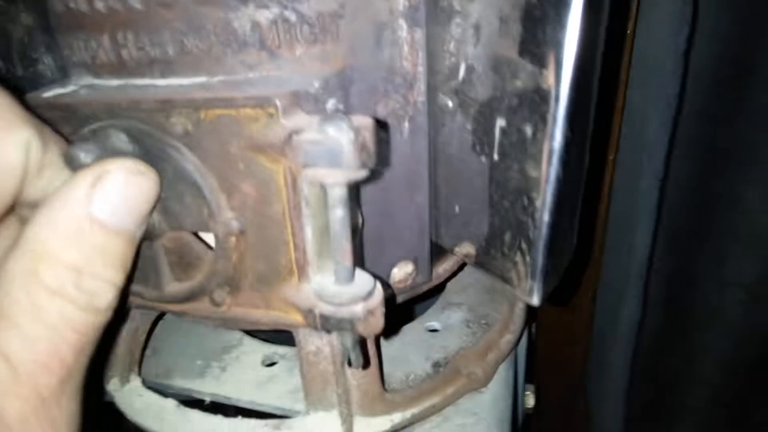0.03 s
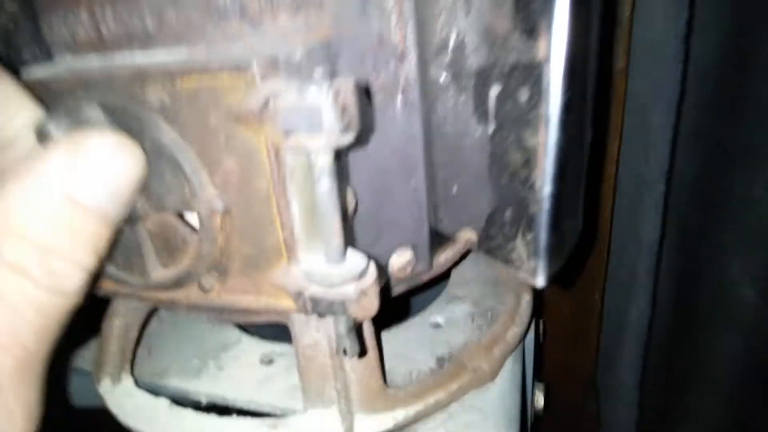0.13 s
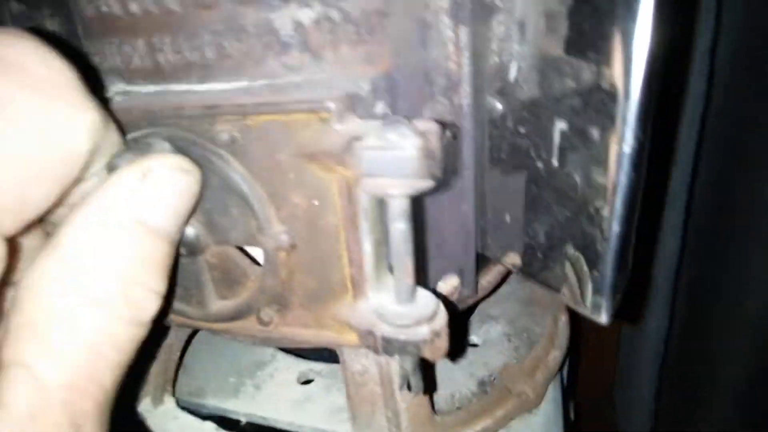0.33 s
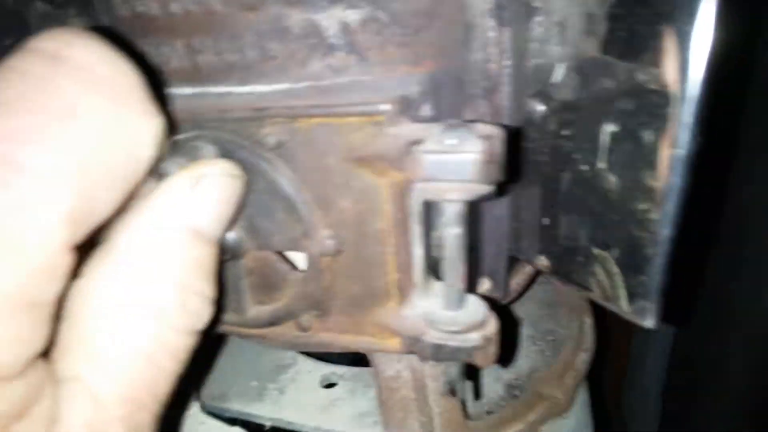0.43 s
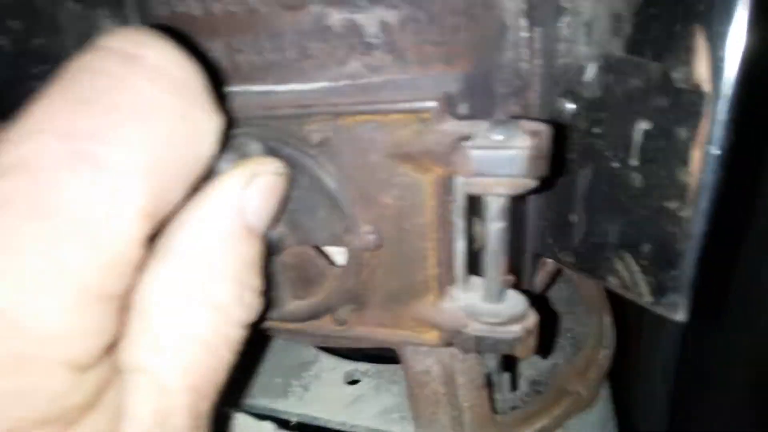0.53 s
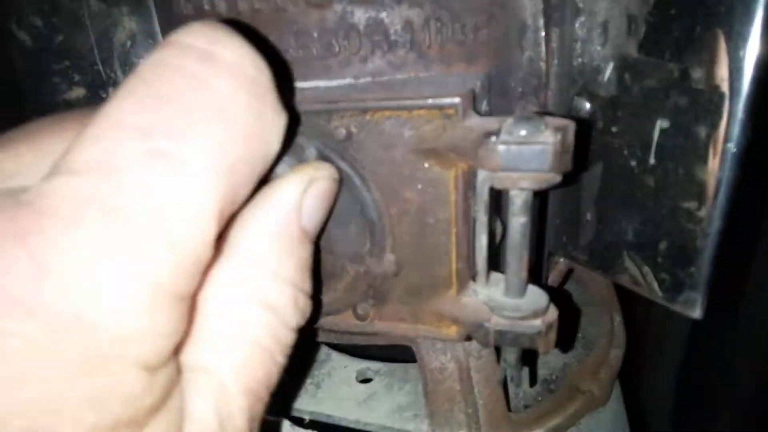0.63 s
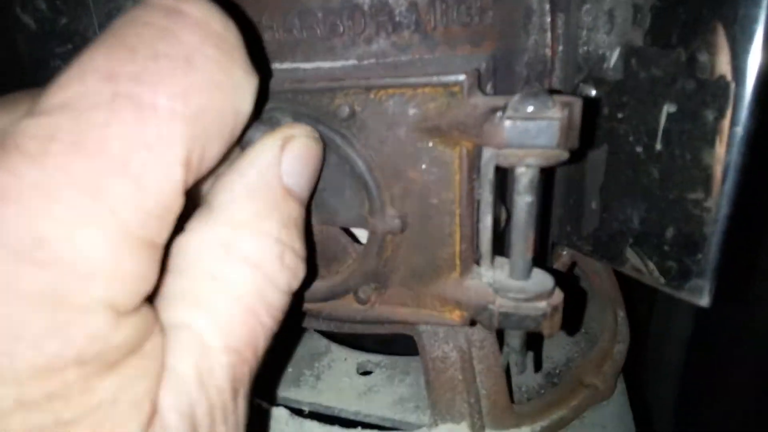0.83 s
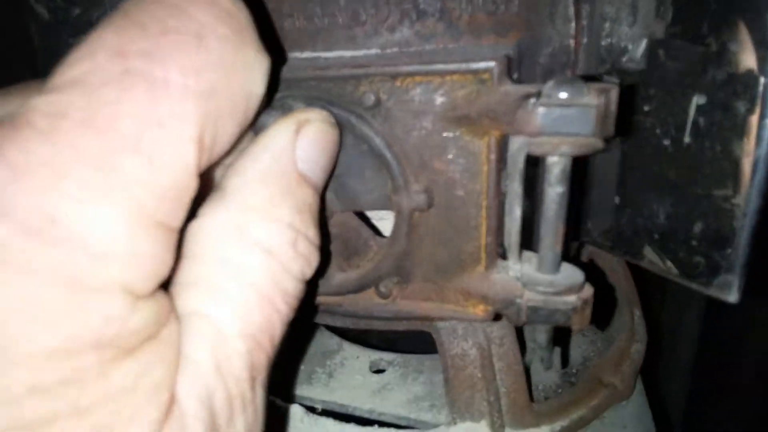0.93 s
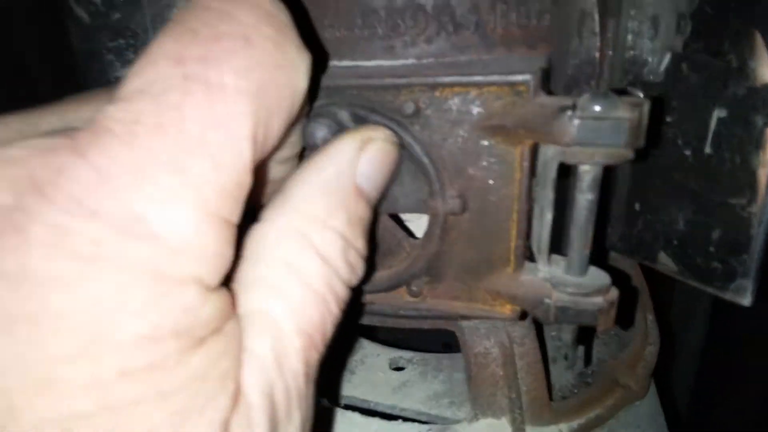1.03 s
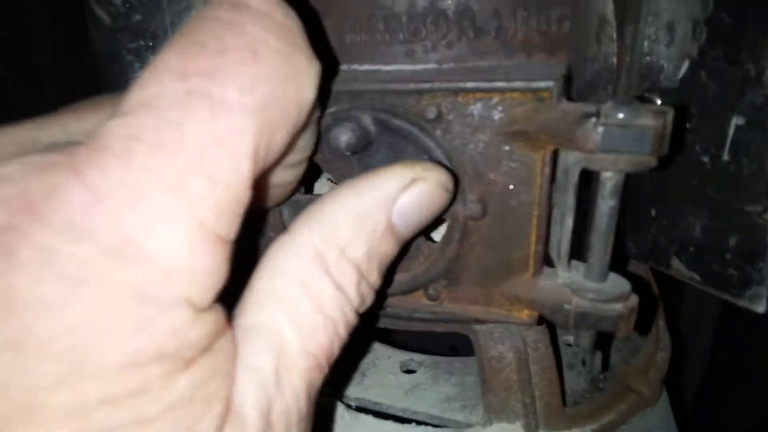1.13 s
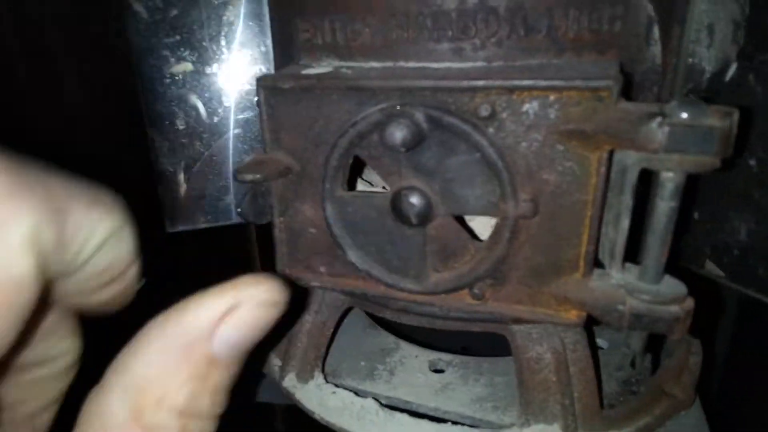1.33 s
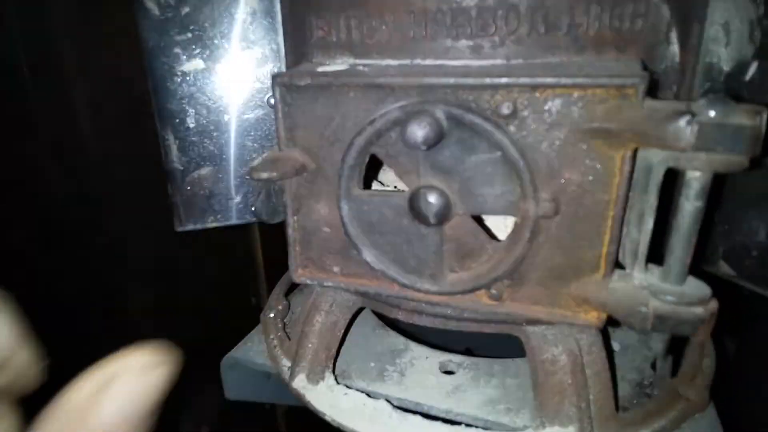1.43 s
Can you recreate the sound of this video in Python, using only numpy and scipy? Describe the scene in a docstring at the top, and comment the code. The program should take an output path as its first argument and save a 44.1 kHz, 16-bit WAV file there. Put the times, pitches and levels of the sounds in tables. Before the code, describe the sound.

A cast iron stove vent clanks and scrapes, turned by hand close by in a quiet cabin. It squeaks free from about 0.2 seconds, and the loose door clanks and rings at 0.3. From 0.7 to 1.1 seconds the rusty disc grinds round, with a sharp ringing knock near 0.8. Faint ticks of grit follow, and fingers softly bump the iron at about 1.3 seconds.

```python
"""The round air vent of a small cast iron stove, turned by hand; one microphone close by in a quiet cabin.
The disc squeaks free and the loose door clanks on its latch; then the disc grinds round on rusty
faces, knocks and settles with a few ticks of grit. The knocks ring the iron of disc, door and
stove body. Fingers bump the iron softly, once, as they let go."""
import sys
import numpy as np
from scipy import signal
from scipy.fft import rfft, irfft
from scipy.io import wavfile
from scipy.ndimage import uniform_filter1d

SR = 44100
rng = np.random.default_rng(int(sys.argv[2]) if len(sys.argv) > 2 else 0)


def generate_wav(sig):
    """Save sig (samples, or channels by samples) to the path in sys.argv[1] as 16-bit PCM at SR."""
    pcm = np.round(np.clip(np.atleast_2d(sig).T, -1, 1) * 32767).astype(np.int16)
    wavfile.write(sys.argv[1], SR, pcm)


N = 66150
T = np.arange(N) / SR
TOP_HZ = 8000


def undb(db):
    """Decibels to gain."""
    return 10 ** (np.asarray(db) / 20)

def at(hz, points):
    """Read a table on a log-frequency axis."""
    freqs, values = np.array(points).T
    return np.interp(np.log(hz + 1e-3), np.log(freqs), values)

def fade(t60):
    """Exponential decay, 60 dB down after t60 seconds."""
    return np.exp(-np.log(1000) * T / t60)

def noise(spectrum):
    """Coloured noise of rms 1."""
    hz = np.arange(N // 2 + 1) * SR / N
    x = irfft(rfft(rng.standard_normal(N)) * undb(at(hz, spectrum)), N)
    return x / x.std()

def wobble():
    """Quick random unsteadiness of spread 1."""
    x = uniform_filter1d(rng.standard_normal(N), size=200)
    return x / x.std()

def add(out, start, sound):
    """Mix a sound in at a time, which may lie before zero."""
    i = int(round(start * SR))
    part = sound[max(-i, 0):N - i]
    out[max(i, 0):max(i, 0) + len(part)] += part

def drive(force, response):
    """A force sounding through a resonant part."""
    return signal.fftconvolve(force, response)[:N]

def radiated(x, corner_hz=350):
    """Small iron plates give off little bass."""
    return signal.sosfilt(signal.butter(2, corner_hz, "high", fs=SR, output="sos"), x)

def ring(modes):
    """A struck part: decaying sines of alternating sign, their levels relative to one another."""
    power = sum(undb(db) ** 2 for _, db, _ in modes) / 2
    tones = sum((-1) ** k * undb(db) * np.sin(2 * np.pi * hz * T) * fade(t60)
                for k, (hz, db, t60) in enumerate(modes))
    return radiated(tones) / np.sqrt(power)


# spectrum of the casting's weak modes (frequency [Hz], relative density [dB])
WASH_SPECTRUM = [(100, -18), (200, -10.5), (400, -5), (800, -2.5), (1750, 5), (2300, -7.5), (3200, -14.5),
                 (4500, -29), (6200, -21.5), (8000, -38.5)]
# their decay (frequency [Hz], t60 [s])
WASH_DECAY = [(150, 0.92), (500, 0.84), (1500, 0.54), (2700, 0.63), (4000, 0.79), (8000, 0.11)]

def casting_wash(count=420):
    """Struck cast iron rings in a dense wash of weak modes."""
    jitter, side = rng.random((count, 2)).T
    root_span = np.sqrt([WASH_SPECTRUM[0][0], TOP_HZ])
    hz = np.interp(np.arange(count) + jitter, [0, count], root_span) ** 2
    gain = undb(at(hz, WASH_SPECTRUM)) * np.sign(side - .5)
    gain *= hz ** .25  # high modes lie further apart, so each carries more
    gain /= np.sqrt(np.sum(gain ** 2) / 2)
    return sum(g * np.sin(2 * np.pi * f * T) * fade(t60)
               for f, g, t60 in zip(hz, gain, at(hz, WASH_DECAY)))

# colour of the clack (frequency [Hz], relative density [dB])
CLACK_SPECTRUM = [(60, -49.5), (150, -24.5), (330, -3.5), (700, -0.5), (1700, 6), (2500, -4), (4000, -15),
                  (5000, -14.5), (6200, -34.5), (8000, -36)]

def clack(contact_s=0.0005):
    """One dry knock of iron on iron."""
    attack = 1 - np.exp(-T / contact_s)
    return radiated(noise(CLACK_SPECTRUM) * fade(t60=0.12) * attack)

# modes of the stove body (frequency [Hz], level [dB], t60 [s])
BODY_MODES = [(518, -18, 0.75), (758.7, -6, 0.79), (892, -15, 0.78), (934, -0.5, .58), (1048, -6.5, 0.27),
              (1082, -4.5, 0.79), (1169, -3, 1.11), (1236, -2.5, 0.3), (1211, 4, 0.54), (1297, -12, 0.9),
              (1438, -9, 1.31), (1488, 0, 0.48), (1797, -4, 1.1), (1910, -9, .65), (1974, 1, .5),
              (2420, -4.5, 0.47)]
# short, hand-damped modes of the vent disc (frequency [Hz], level [dB], t60 [s])
DISC_MODES = [(735, 1.5, 0.14), (1144, -9, 0.31), (1653, 3.5, 0.06), (1719, 4.5, 0.08), (2404, -13, .1)]
# blows at the vent (time [s], wash level [dB], body level [dB], disc level [dB], clack level [dB])
VENT_BLOWS = [(-0.02, -53.5, -44, -69, -83), (0.2053, -43.5, -49.5, -62.5, -47),
              (0.2134, -42.5, -45, -41, -57.5), (0.3122, -38, -56, -27.5, -27),
              (0.3256, -37.5, -47, -38.5, -30), (0.332, -51, -42, -30, -30.5), (0.7737, -54, -35, -32, -37),
              (0.7768, -35.5, -54, -20, -30.5), (0.8102, -42, -63, -44, -46),
              (0.8469, -42, -51.5, -41, -48), (0.8691, -47.5, -50.5, -51.5, -59.5),
              (0.9488, -58, -64.5, -35, -42), (1.045, -63, -59.5, -43.5, -48.5)]

def clanks(wash, body, disc):
    """Close to the microphone, each blow clacks and shares its force between stove and disc."""
    out = np.zeros(N)
    for start, wash_db, body_db, disc_db, clack_db in VENT_BLOWS:
        ringing = undb(wash_db) * wash + undb(body_db) * body + undb(disc_db) * disc
        add(out, start, ringing + undb(clack_db) * clack())
    return out

# modes of the door (frequency [Hz], level [dB], t60 [s])
DOOR_MODES = [(362, -3, 0.093), (587, -8.5, 0.6), (879, -12.5, 0.49), (981.2, 1, 0.65), (1016.4, -2, 0.75),
              (1080, -2, 0.88), (1135, 1, .36), (1360, -16.5, .4), (1416, 1, 0.4), (1666, -8, 0.44),
              (1710, 3.5, 0.12), (1757, -10, 0.83), (1853, -18, 0.93), (2096, -8, 0.62), (2356, -18, .55),
              (2845, -10.5, 0.62), (2965, -21, 0.36), (3300, -20.5, 0.72), (3850, -34.5, 0.84),
              (6100, -35, 1.0)]
# blows on the latch (time [s], level [dB])
LATCH_BLOWS = [(-0.02, -44.5), (0.2126, -39), (0.3125, -32), (0.326, -27)]

def door_bangs(door):
    """The loose door bangs on its latch and rings."""
    out = np.zeros(N)
    for start, db in LATCH_BLOWS:
        add(out, start, undb(db) * door)
    return out

# room tone of the cabin (frequency [Hz], relative density [dB])
CABIN_SPECTRUM = [(25, -2), (60, -8), (140, -3), (300, -7.5), (800, -13), (1800, -13), (2600, -23.5),
                  (7000, -21), (8500, -41.5)]

def cabin_air():
    """The quiet cabin around the microphone: faint, steady noise."""
    return undb(-71.5) * noise(CABIN_SPECTRUM)

# strength of the grinding (time [s], relative level [dB])
GRIND_FORCE = [(0, -7), (0.06, -19), (0.11, -32), (0.698, -30.5), (0.717, -6), (0.745, -1.5), (0.772, -4),
               (0.799, 0.5), (0.87, -3.5), (0.889, -22.5), (0.95, -18), (1.001, -13), (1.042, -8.5),
               (1.068, -46), (1.108, -39.5)]

def grinding(wash, body, disc, rim, slips_per_s=900, spread_db=1, slip_hz=2300):
    """Rusty faces slip in dense, uneven jerks as the disc turns, shaking the iron."""
    slips = (rng.random(N) < slips_per_s / SR) * rng.choice([-1, 1], N)
    slips = slips * undb(spread_db * rng.standard_normal(N))
    soft_slips = signal.sosfilt(signal.butter(2, slip_hz, fs=SR, output="sos"), slips)  # worn faces
    times, db = np.array(GRIND_FORCE).T
    turning = (T > times[0]) & (T < times[-1])
    force = soft_slips * undb(np.interp(T, times, db)) * turning
    ringing = undb(-58) * wash + undb(-55.5) * body + undb(-50) * disc + undb(-54.5) * rim
    return drive(force, ringing + undb(-46.5) * clack())

# colour of cracking rust (frequency [Hz], relative density [dB])
RUST_SPECTRUM = [(300, 4.5), (2000, 11), (3800, 4.5), (4800, -4), (6200, 0), (7500, -9), (8500, -35)]

def crack(t60):
    """A short, unpitched crack of rust between two faces."""
    return radiated(noise(RUST_SPECTRUM) * fade(t60))

# contact modes of the disc rim (frequency [Hz], level [dB], t60 [s])
RIM_MODES = [(3670, -0.5, 0.045), (3833, 3, .045), (4010, 3, 0.02), (5200, -14, 0.025), (5730, -3.5, .05),
             (6000, -3, .03), (6900, -21.5, 0.022)]
# catches of the disc (time [s], crack level [dB], rim level [dB])
CATCHES = [(0.205, -48, -52.5), (0.2108, -39, -51), (0.3121, -38.5, -54), (0.3267, -33.5, -41),
           (0.693, -41, -42), (0.7155, -49, -50), (0.7277, -49, -53.5), (0.7533, -43, -52),
           (0.774, -27, -30), (0.81, -39, -38), (0.821, -36, -39.5), (0.8464, -34.5, -39),
           (0.8679, -38, -35)]

def rim_ticks(rim):
    """The disc catches on its seat with a crack and a bright ping of the rim."""
    out = np.zeros(N)
    for start, crack_db, rim_db in CATCHES:
        add(out, start, undb(crack_db) * crack(t60=0.07) + undb(rim_db) * rim)
    return out

# squeaks of the disc
# (time [s], length [s], starting pitch [Hz], glide [share of pitch], level [dB], brightness [dB])
DISC_SQUEAKS = [(0.2068, 0.0095, 514, .2, -36.5, -17), (0.256, 0.022, 1004, -0.032, -31.5, 2.5),
                (0.281, 0.027, 996, 0, -38, 0.5), (0.299, 0.0067, 1690, 0.024, -35, -29.5),
                (0.699, 0.011, 1720, 0.032, -49.5, -8.5), (1.025, 0.022, 1698, 0.0039, -45.5, -34)]
# their overtones (harmonic number, relative level [dB])
SQUEAK_HARMONICS = [(2, -27), (3, -23), (4, -20), (5, -33), (7, -39)]

def squeaks(door, edge_s=.002, waver=.014, flutter_db=1.2, overtone_flutter_db=4):
    """Stick-slip locks briefly into a wavering, raspy tone, which sets the door ringing."""
    out = np.zeros(N)
    for start, length, hz, glide, db, bright_db in DISC_SQUEAKS:
        pitch = hz * (1 + glide * np.minimum(T / length, 1) + waver * wobble())
        phase = 2 * np.pi * np.cumsum(pitch) / SR
        overtones = sum(undb(level) * np.sin(k * phase) for k, level in SQUEAK_HARMONICS)
        overtones *= undb(-1 + overtone_flutter_db * wobble())
        rasp = undb(-30) * noise(RUST_SPECTRUM) * (1 + np.cos(phase)) / 2  # pulses once a cycle
        fundamental = undb(flutter_db * wobble()) * np.sin(phase)
        tone = fundamental + undb(bright_db) * (overtones + rasp)
        envelope = np.minimum(T / edge_s, 1) * np.exp(-np.maximum(T - length, 0) / edge_s)
        add(out, start, undb(db) * np.sqrt(2) * tone * envelope)
    return out + undb(-58) * drive(out, door)

# ticks of grit (time [s], level [dB])
GRIT_TICKS = [(0.599, -56), (0.944, -53.5), (1.026, -46.5), (1.0884, -56), (1.1314, -60.5), (1.264, -65),
              (1.311, -62.5), (1.449, -68.5)]

def rust_grit():
    """Grains of rust crack dryly, mostly as the disc settles."""
    out = np.zeros(N)
    for start, db in GRIT_TICKS:
        add(out, start, undb(db) * crack(t60=0.04))
    return out

# touch of the fingers (time [s], level [dB])
FINGER_BUMPS = [(1.347, -65)]

def fingers(hz=164):
    """A dull bump as the hand leaves the knob, faint even this close."""
    out = np.zeros(N)
    envelope = fade(t60=0.094) * np.minimum(T * hz, 1)  # rises over one cycle
    for start, db in FINGER_BUMPS:
        add(out, start, undb(db) * 2 * np.sin(2 * np.pi * hz * T) * envelope)
    return out


def scene():
    """The stove from close by, over the room tone of the cabin, in mono."""
    wash = casting_wash()
    body, disc, door, rim = ring(BODY_MODES), ring(DISC_MODES), ring(DOOR_MODES), ring(RIM_MODES)
    mix = (clanks(wash, body, disc) + door_bangs(door) + cabin_air() + grinding(wash, body, disc, rim)
           + rim_ticks(rim) + squeaks(door) + rust_grit() + fingers())
    return mix[None]

def record(dry):
    """The microphone thins the deep bass; the recorder cuts the top steeply."""
    low_cut = signal.butter(2, 74, "high", fs=SR, output="sos")
    top_cut = signal.ellip(8, .2, 70, TOP_HZ, fs=SR, output="sos")
    return signal.sosfilt(top_cut, signal.sosfilt(low_cut, dry))


dry = scene()
out = record(dry)
generate_wav(out)
```